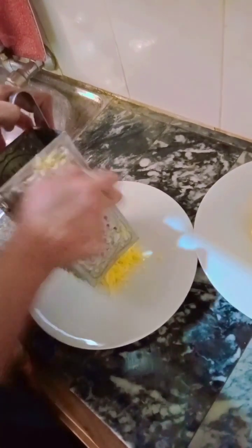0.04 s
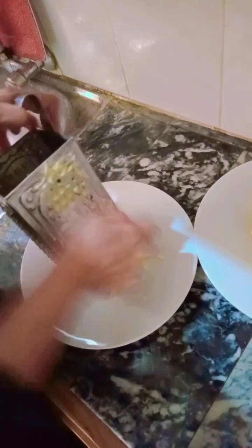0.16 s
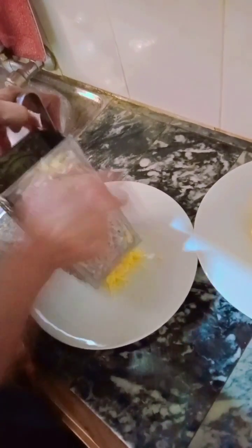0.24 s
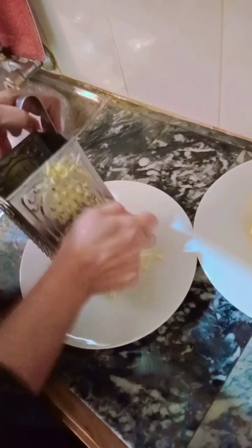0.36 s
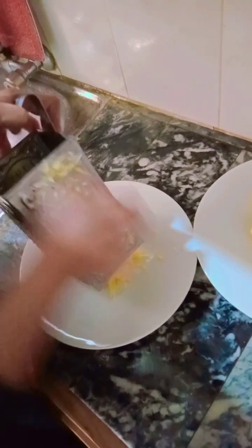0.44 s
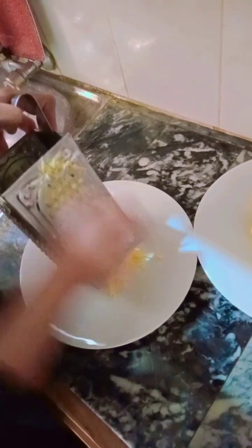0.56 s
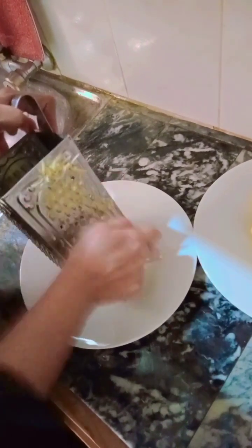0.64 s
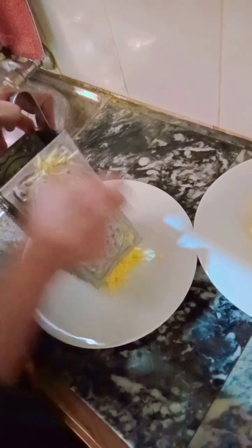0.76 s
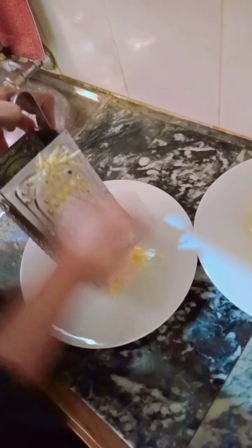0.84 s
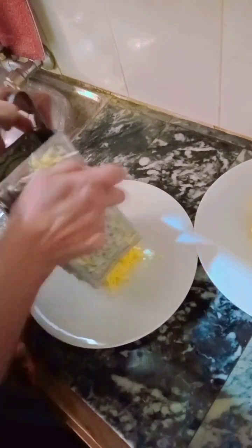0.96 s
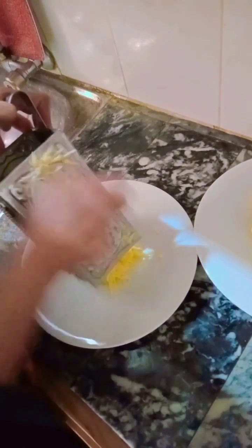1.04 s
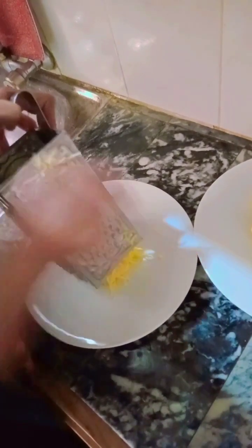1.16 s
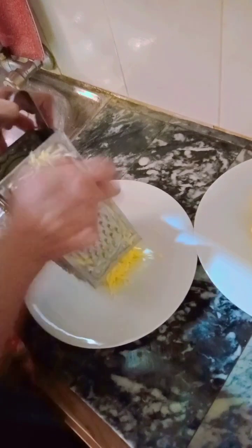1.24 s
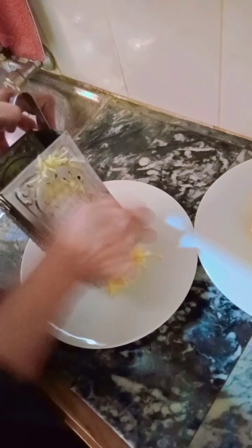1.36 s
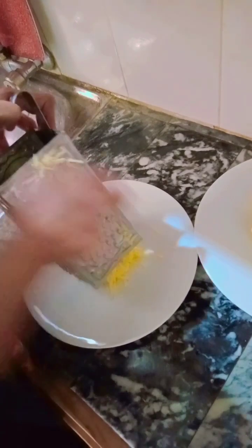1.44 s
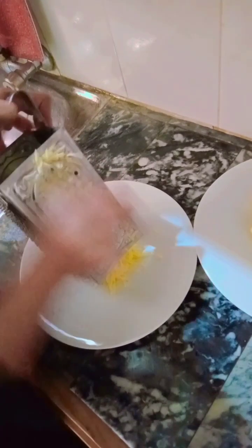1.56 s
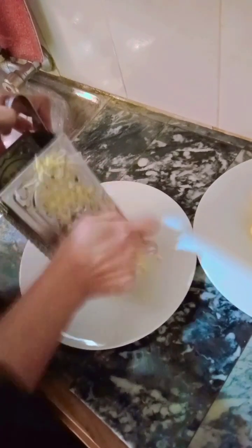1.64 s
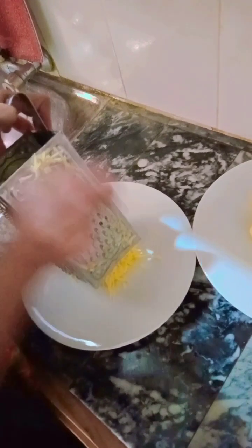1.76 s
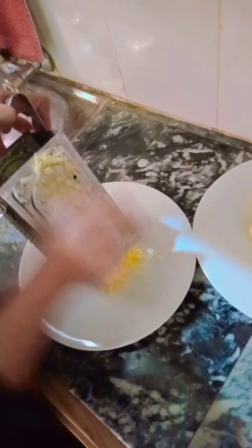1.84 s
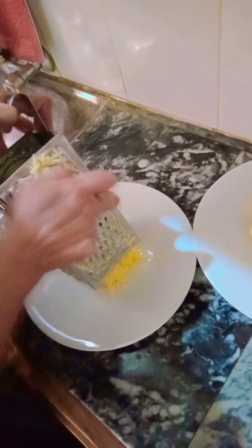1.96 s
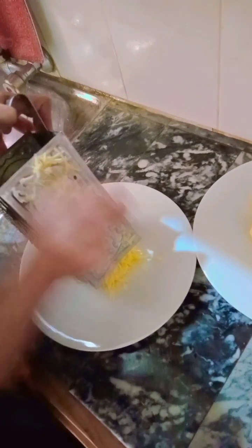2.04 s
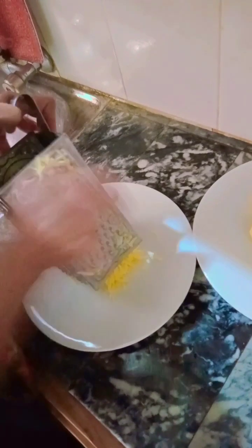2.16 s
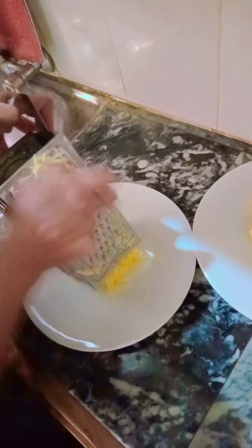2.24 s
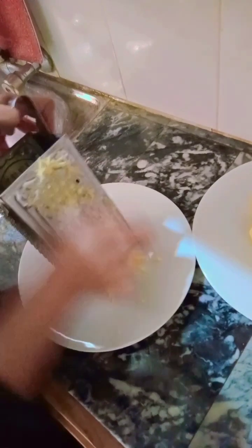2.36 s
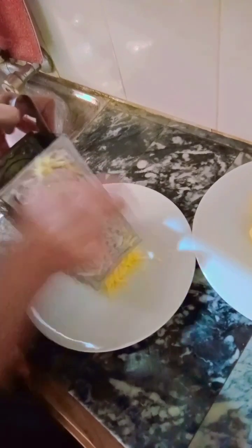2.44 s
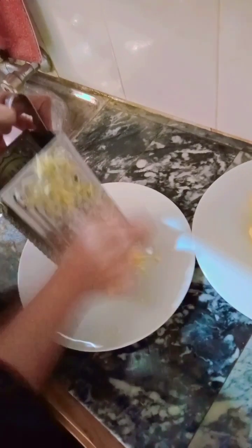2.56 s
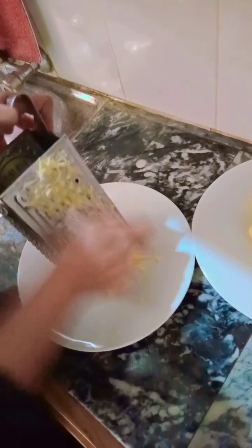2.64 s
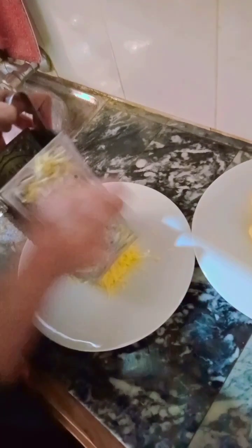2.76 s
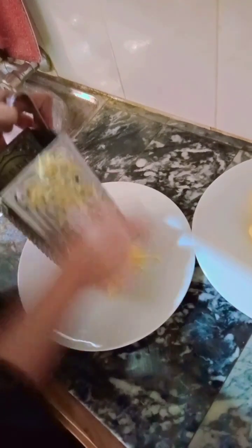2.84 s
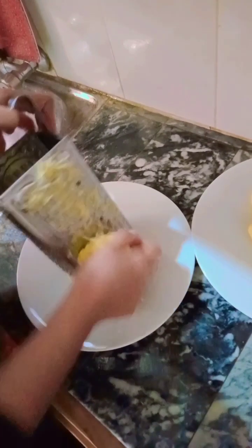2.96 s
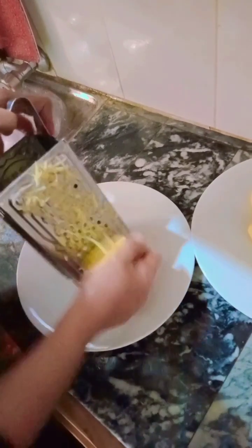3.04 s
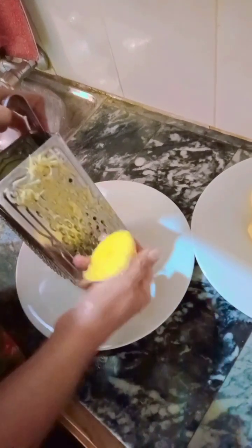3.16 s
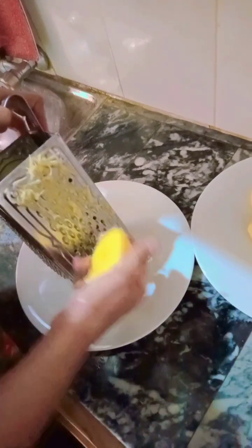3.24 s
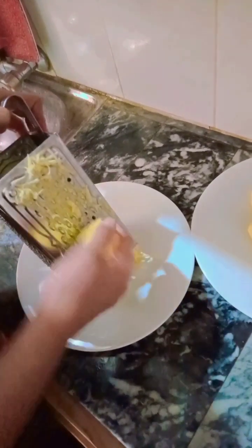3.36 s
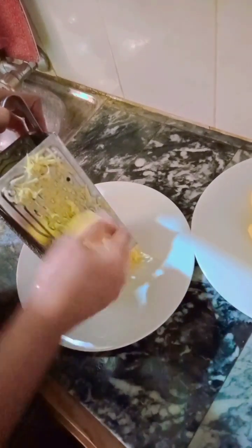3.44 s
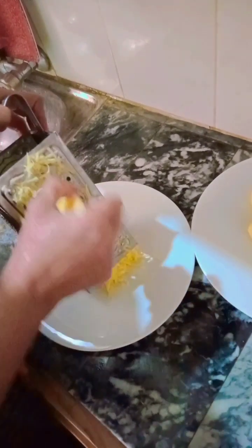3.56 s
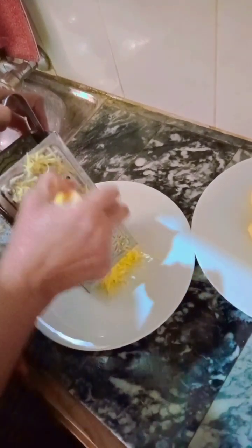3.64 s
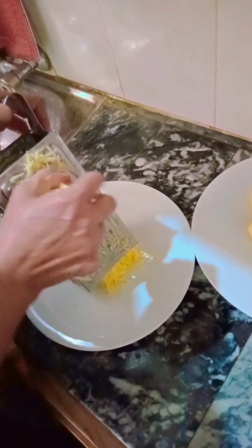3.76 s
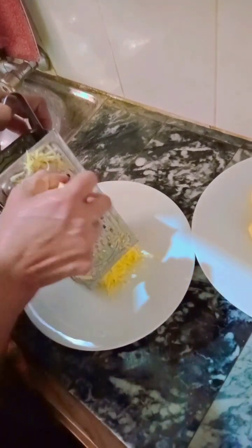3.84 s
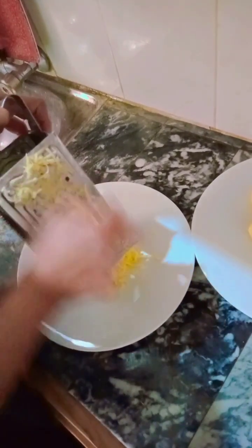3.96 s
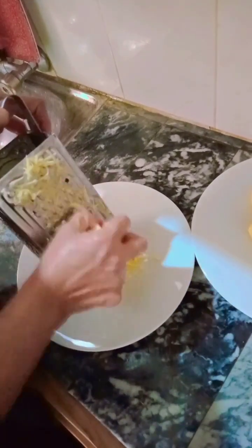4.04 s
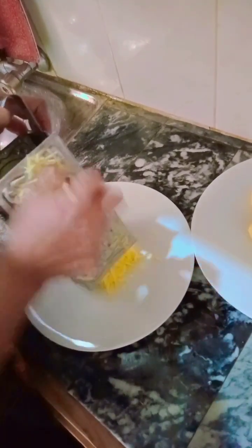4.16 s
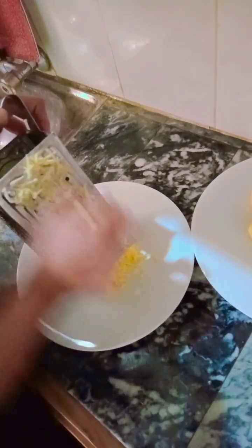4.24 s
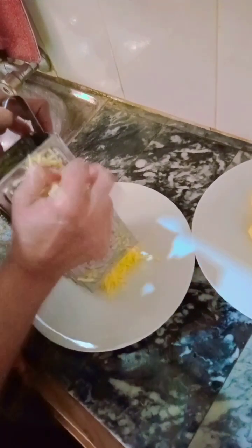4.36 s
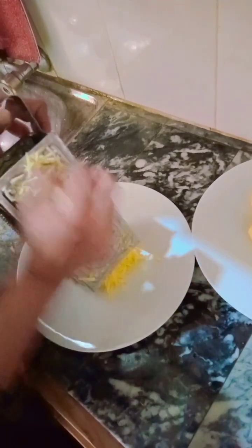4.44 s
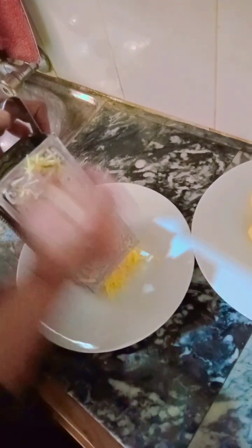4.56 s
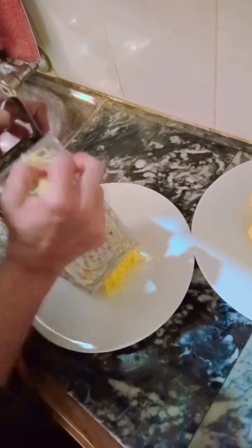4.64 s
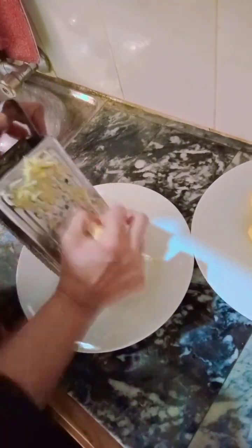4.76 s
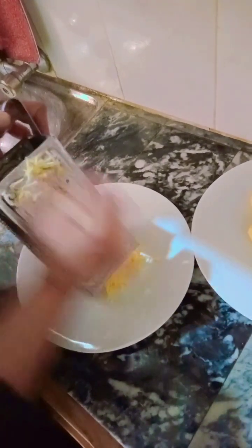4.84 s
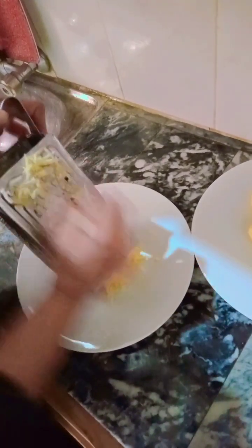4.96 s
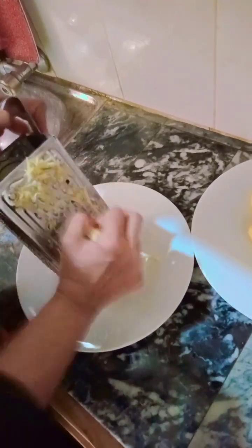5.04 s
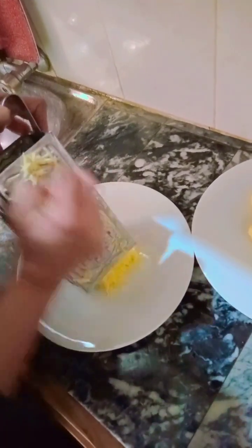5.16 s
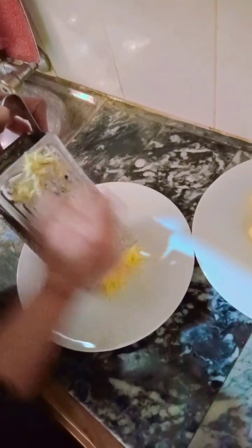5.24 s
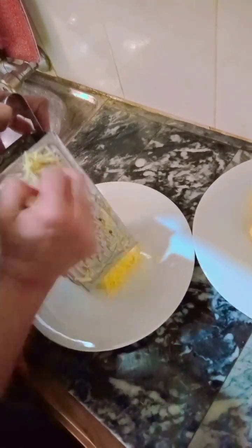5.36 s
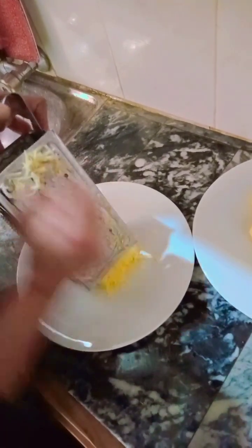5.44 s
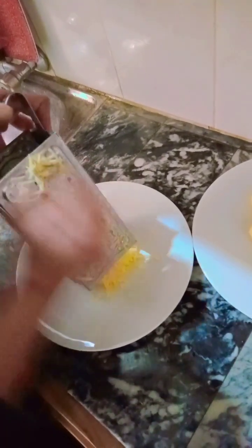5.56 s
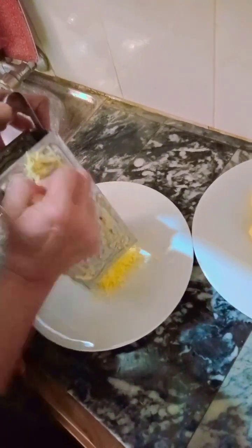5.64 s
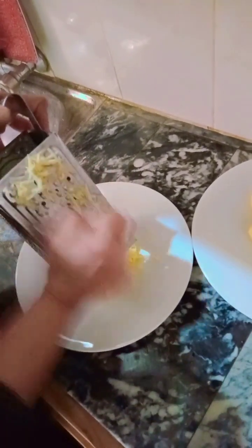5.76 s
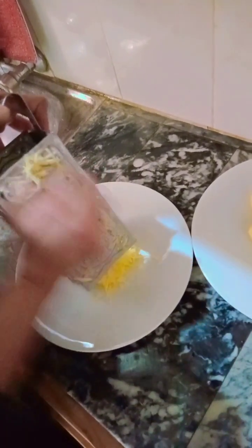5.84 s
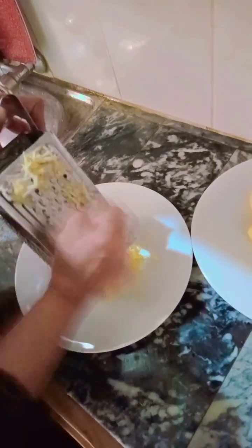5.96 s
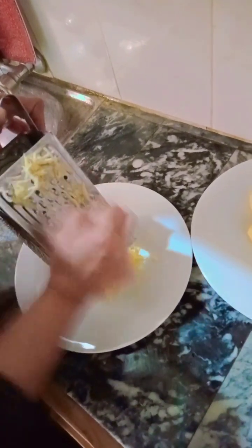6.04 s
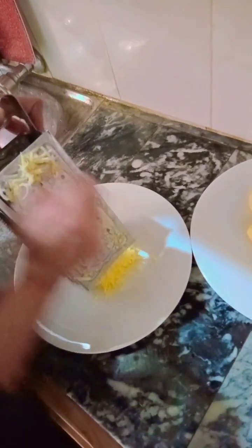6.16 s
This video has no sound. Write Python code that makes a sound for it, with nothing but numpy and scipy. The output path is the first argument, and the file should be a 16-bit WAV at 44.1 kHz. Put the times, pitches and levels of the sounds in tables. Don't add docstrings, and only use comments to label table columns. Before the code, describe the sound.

From 0 to 2.65 s a potato is rasped quickly on a steel box grater, close to the microphone: strong gritty pushes of about 0.13 s every quarter second, each preceded by a shorter, somewhat weaker pull. The tearing is a bright, crunchy hiss with a tinny sheet ring and hollow box resonance; a knock lands at 1.3 s. At 2.7 s the grater bumps and rocks softly, and at 2.86 s its rim taps the plate with a short clink. Only faint brushes and quiet room air remain until 3.7 s. Grating then resumes, softer and more hollow, with dull knocks around 3.9, 4.1, 4.5 and 5.1 s, growing firmer near 4.7 to 5.2 s. At 5.29 s the rim skips on the china in a loud metallic clatter lasting a tenth of a second. Lighter strokes continue, with a small tick at 5.57 s, through the end just past 6 s. Tiles add a brief echo.

```python
import sys
import numpy as np
from scipy import signal
from scipy.fft import rfft, irfft, next_fast_len
from scipy.io import wavfile
from scipy.ndimage import uniform_filter1d, map_coordinates

SR = 44100
rng = np.random.default_rng(int(sys.argv[2]) if len(sys.argv) > 2 else 0)


def invert_db(x):
    u = np.asarray(x, float) / 20
    return 10 ** u


def waveform_to_disk(signal):
    frames = np.transpose(np.atleast_2d(signal))
    scaled = np.clip(frames, -1, 1) * 32767
    samples = np.round(scaled).astype(np.int16)
    wavfile.write(sys.argv[1], SR, samples)


N = 272979

# centre in Hz, width in Hz, level in dB.
SHEET_MODES = [(1371, 114, -9), (1705, 170, -9), (2067, 295, -8), (2430, 153, -1.5), (2768, 212, -2),
               (3186, 400, -5), (3448, 90, -1.5), (3693, 102, -0.5), (4196, 180, -7), (4950, 120, -15.5)]
# centre in Hz, width in Hz, level in dB.
BOX_MODES = [(161, 30, -17), (260.2, 16.8, -10), (353, 29, 0), (453.6, 65, -1), (626.5, 52.5, -5),
             (728, 96, -2.5), (808, 124, -4), (915.6, 72, -2.5), (1233, 135, -11.5), (1296, 119, -12)]
# centre in Hz, width in Hz, level in dB.
CRACK_MODES = [(700, 280, -2.5), (1710, 700, -5), (3110, 1100, -20)]


def unit(x):
    return x / np.sqrt(np.mean(x ** 2) + 1e-20)


def along(points, hz):
    f, v = np.transpose(points)
    return np.interp(np.log(hz + 1), np.log(f + 1), v)


def wobble(rate):
    knots = rng.standard_normal(int(N * rate / SR) + 4)
    return map_coordinates(knots, [np.arange(N) * rate / SR])


def filtered(x, response):
    m = next_fast_len(N + SR // 2)
    hz = np.fft.rfftfreq(m, 1 / SR)
    return irfft(rfft(x, m) * response(hz), m)[:N]


def resonant(modes):
    def response(f):
        total = 0
        for k, (centre, width, db) in enumerate(modes):
            damping = 1j * f * width
            total = total + (-1) ** k * invert_db(db) * damping / (centre * centre - f * f + damping)
        return total
    return response


def snaps(per_s, spread_db, smooth):
    when, size, sign = rng.random((3, N))
    heights = invert_db(-spread_db * np.log(size + 0.0074)) * np.sign(sign - 0.5)
    pops = (when < per_s / SR) * heights
    return unit(unit(pops) + smooth * rng.standard_normal(N))


def pressure():
    # start in s, length in s, shred in dB, swell toward the end in dB.
    pushes = [(0.05, 0.13, -26.5, -1), (0.295, 0.12, -26.5, -3), (0.531, 0.13, -27, -8),
              (0.778, 0.11, -27, 2.8), (1.009, 0.14, -26.5, -0.5), (1.264, 0.16, -29.5, 14),
              (1.538, 0.12, -27, -0.5), (1.768, 0.12, -28.5, 2), (2.005, 0.13, -27.5, 0),
              (2.263, 0.13, -29, 2.5), (2.516, 0.14, -28.5, 3), (3.77, 0.05, -41, -20.5),
              (3.948, 0.12, -36, 7.5), (4.192, 0.12, -32.2, 1), (4.438, 0.12, -31.5, -2),
              (4.681, 0.13, -29, 7), (4.942, 0.13, -30, 0), (5.189, 0.12, -29.5, -9.5),
              (5.418, 0.13, -35, 5), (5.656, 0.13, -36, 19.5), (5.903, 0.15, -35.5, 19),
              (6.156, 0.1, -45.5, 8)]
    # start in s, length in s, shred in dB, swell in dB.
    pulls = [(-0.009, 0.062, -31, -32), (0.207, 0.079, -33, -9.5), (0.457, 0.071, -32, -6.5),
             (0.698, 0.072, -30.5, 1.5), (0.934, 0.074, -32, 6), (1.175, 0.086, -32, 15),
             (1.448, 0.083, -33, 19), (1.658, 0.1, -39.5, 42), (1.906, 0.092, -35.5, 22),
             (2.162, 0.088, -34.5, 29), (2.42, 0.089, -32.5, 13), (3.694, 0.086, -39, 7.5),
             (3.842, 0.093, -41.5, 19.5), (4.074, 0.12, -38.5, 7), (4.342, 0.088, -36.5, 8),
             (4.621, 0.063, -33, -4), (4.861, 0.075, -32.5, -2), (5.105, 0.087, -35, -7),
             (5.348, 0.072, -39.5, 9), (5.59, 0.071, -40, 5.5), (5.843, 0.071, -39.5, 30.5),
             (6.09, 0.08, -40, 10)]
    # start in s, length in s, shred in dB, swell in dB.
    drags = [(.42, 0.075, -53, -2.5), (.66, 0.092, -52.5, 2), (.9, 0.064, -54, -3), (2.69, 0.064, -60, -2),
             (2.74, 0.08, -72, 0), (2.812, 0.04, -60.5, -3), (3.205, .03, -80, -6),
             (3.317, 0.063, -67.5, -11), (3.421, 0.047, -73, 14), (3.49, 0.019, -78.5, 0),
             (3.581, 0.022, -67.5, -24.5), (3.592, 0.14, -72.5, 13), (4.59, 0.041, -45.5, 1.5),
             (4.825, 0.037, -49, -8), (5.075, 0.037, -54, 0), (5.81, 0.061, -61, 6)]
    # time in s, extra ring in dB.
    fresh_face = [(0, -0.2), (1.0, -0.9), (1.35, -0.5), (1.8, 0.2), (2.15, -2.5), (2.6, -0.1), (3.2, 0),
                  (3.75, 1.5), (4.1, 1), (4.3, -0.5), (4.5, 2.5), (4.72, -3.4), (4.9, -1.5), (5.2, -2),
                  (5.5, -1), (6.1, 0)]
    firm_db = -30
    sheet_per_soft_db, box_per_soft_db, fresh_on_sheet = 0.1555, 0.2523, 0.25
    # strokes, sheet and box over the shred in dB, roundness (low = full speed is reached at once and held)
    kinds = (pushes, 0.8, -0.84, 0.9), (pulls, 3.5, 1.03, 1.06), (drags, 1.2, -1, 0.63)

    out = np.zeros((3, N + SR))
    for strokes, sheet_db, box_db, roundness in kinds:
        for start, length, db, swell_db in strokes:
            span = np.arange(max(round(start * SR), 0), round((start + length) * SR))
            u = np.clip((span / SR - start) / length, 0, 1)
            speed = np.abs(np.sin(np.pi * u)) ** (roundness * np.array([[1.1], [0.9], [0.8]]))
            swell = swell_db * np.array([[1], [0.7], [0.55]]) * (u - 0.5)
            soft = firm_db - db
            fresh = np.interp(start, *np.transpose(fresh_face))
            sheet_ring = sheet_db + sheet_per_soft_db * soft + fresh_on_sheet * fresh
            box_ring = box_db + box_per_soft_db * soft + fresh
            out[:, span] += speed * invert_db(db + swell + [[0], [sheet_ring], [box_ring]])
    out = out[:, :N]
    return out + invert_db(-27.5) * uniform_filter1d(out, size=5000, axis=1)


def patchy(x, depth_db):
    z = signal.stft(x, nperseg=1024)[2]
    field = uniform_filter1d(rng.standard_normal(z.shape), size=5, axis=0)
    field = uniform_filter1d(field, size=5, axis=1)
    return signal.istft(z * invert_db(depth_db * unit(field)), nperseg=1024)[1][:N]


def rasp():
    # frequency in Hz, density in dB per Hz.
    shred_spectrum = [(2530, -22.5), (4300, -2), (4630, -4), (5830, -12), (7500, -7.5), (8180, -1.5),
                      (9150, 0), (10500, -11), (12500, -11), (14100, -12), (15500, -11.5)]
    shred, sheet, box = pressure()
    catch = wobble(70)

    hiss = unit(filtered(snaps(6000, 1.6, smooth=1.25), lambda f: invert_db(along(shred_spectrum, f))))
    hiss = patchy(hiss, depth_db=1.3) * shred * invert_db(0.58 + 1.63 * catch + 0.98 * wobble(260))

    face = snaps(3000, 1.8, smooth=1.0) * sheet * invert_db(0.24 * catch + 0.9 * wobble(150))
    hollow = snaps(1200, 2.1, smooth=0.8) * box * invert_db(0.9 * catch + 0.7 * wobble(30))
    ring = invert_db(14) * filtered(face, resonant(SHEET_MODES))
    ring = ring + invert_db(19) * filtered(hollow, resonant(BOX_MODES))

    push = rng.standard_normal(N) * uniform_filter1d(box, size=9000)
    counter = filtered(push, resonant([(97.7, 72, 2.4)]))
    return hiss + patchy(ring, depth_db=3.0) + counter


def knocks():
    # time in s, peak in dB, sheet share in dB.
    blows = [(1.311, -10.5, -2.5), (3.724, -26, -9), (3.867, -20, -8.5), (3.879, -16, -16),
             (4.089, -10, -11), (4.225, -18, -5), (4.475, -13, -4), (4.641, -23, 8), (4.881, -14.5, -8),
             (5.12, -13, -9.5), (0.305, -31.5, 0), (2.282, -22.5, 2.8), (3.742, -20, -19),
             (4.116, -14, -6.5), (4.457, -22.5, 0.5), (4.363, -20, -16)]
    t = np.arange(SR // 20) / SR
    scuff_s = np.array([[0.04], [0.04], [0.015]])
    low, high, crack = np.zeros((3, N))
    for s, db, sheet_db in blows:
        contact = rng.standard_normal((3, len(t))) + 9 * (t == 0)
        puff = invert_db(db - 60 * t / scuff_s) * contact
        low[round(s * SR):][:len(t)] += puff[0]
        high[round(s * SR):][:len(t)] += invert_db(sheet_db) * puff[1]
        crack[round(s * SR):][:len(t)] += puff[2]
    box = invert_db(12) * filtered(low, resonant(BOX_MODES))
    sheet = invert_db(6.5) * filtered(high, resonant(SHEET_MODES))
    return box + sheet + invert_db(-1.0) * filtered(crack, resonant(CRACK_MODES))


def clink(hits, modes, ring_db, rattle_db, rattle_s, shiver):
    out, jolt = np.zeros((2, N + SR))
    t = np.arange(SR // 4) / SR
    onset = 1 - np.exp(-t / 0.00035)
    for s, db in hits:
        for hz, level, t60 in modes:
            drift = np.cumsum(rng.standard_normal(len(t))) / np.sqrt(SR)
            phase = 2 * np.pi * hz * t + shiver * np.sqrt(hz / 3100) * drift
            ring = invert_db(level + rng.normal(0, 1.2) - 60 * t / t60) * np.sin(phase)
            out[round(s * SR):][:len(t)] += invert_db(db + ring_db) * onset * ring
        rattle = invert_db(db + rattle_db - 60 * t / rattle_s) * rng.standard_normal(len(t))
        jolt[round(s * SR):][:len(t)] += rattle

    def whole_grater(f):
        body = resonant(SHEET_MODES)(f) + invert_db(-1.5) * resonant(BOX_MODES)(f)
        body = body + invert_db(-0.5) * resonant(CRACK_MODES)(f)
        return body / (1 + 1j * f / 4500) ** 2

    return out[:N] + filtered(jolt[:N], whole_grater)


def clatter():
    # time in s, peak in dB.
    skips = [
        (5.287, -0.5),
        (5.295, 2),
        (5.306, -2),
        (5.327, -4),
        (5.331, -7.5),
        (5.35, -16),
        (5.361, -15),
        (5.377, -18),
    ]
    # frequency in Hz, level in dB, t60 in s.
    skip_modes = [(341.8, -10.5, 0.3), (894, -8, 0.094), (1113, 3.3, 0.13), (1297, 0, 0.055),
                  (1460, -7, .13), (1480, -8.5, 0.11), (1595, -2, 0.048), (2207, 0, 0.1),
                  (2810, 2.5, 0.037), (2810, -3, .2), (3280, -28, 0.18), (3560, -1.5, 0.12),
                  (3970, -18, 0.16), (4520, -14.5, 0.1), (4780, -14, 0.075), (4920, -20, 0.056),
                  (6300, -34, .1), (5300, -26, 0.12)]
    return clink(skips, skip_modes, ring_db=-19.5, rattle_db=-3.5, rattle_s=0.06, shiver=21)


def tap():
    # time in s, peak in dB.
    touches = [
        (2.86, -14),
        (2.864, -11.5),
        (2.88, -26),
    ]
    # frequency in Hz, level in dB, t60 in s.
    tap_modes = [(365.6, -1, 0.21), (728, -2, 0.13), (793, -17.5, .07), (900, 3.5, 0.14), (1150, 9, 0.081),
                 (1678, 9.5, 0.036), (2136, 12.5, 0.023), (2240, -14.5, 0.31), (2860, -4.5, 0.18),
                 (3200, -14, 0.13), (3670, -13, 0.13), (5030, -14.5, 0.12), (6850, -10, .03),
                 (9120, -6.5, 0.037)]
    return clink(touches, tap_modes, ring_db=-14.5, rattle_db=4, rattle_s=0.06, shiver=9)


def bump():
    # time in s, peak in dB.
    rocks = [
        (2.679, -16),
        (2.688, -18),
        (2.712, -25),
    ]
    # frequency in Hz, level in dB, t60 in s.
    bump_modes = [(365, -3.5, 0.22), (474, -7.5, .1), (728, -20, .1), (928, 3, 0.07), (1240, -9.5, 0.071),
                  (1370, -14, 0.065), (1690, -8.5, 0.041), (2310, -6, 0.033), (3100, -15, .03)]
    return clink(rocks, bump_modes, ring_db=-9, rattle_db=-3, rattle_s=0.025, shiver=26)


def tick():
    # time in s, peak in dB.
    touch = [
        (5.5679, -14),
    ]
    # frequency in Hz, level in dB, t60 in s.
    tick_modes = [(924, -5.5, 0.11), (2370, 1, 0.031), (2940, -3.5, 0.23), (3630, -9, 0.07),
                  (4500, -16, 0.065), (5300, -32, 0.0635)]
    return clink(touch, tick_modes, ring_db=-11.5, rattle_db=6.5, rattle_s=0.015, shiver=7.4)


def thuds():
    # time in s, peak in dB.
    swings = [
        (2.704, -33),
        (2.784, -44),
        (3.73, -54),
        (3.87, -37),
        (4.09, -34.5),
        (4.291, -48.5),
    ]
    out, t = np.zeros(N + SR), np.arange(SR // 8) / SR
    swing = (1 - np.exp(-t / 0.008)) * np.sin(2 * np.pi * 172 * t)
    for s, db in swings:
        out[round(s * SR):][:len(t)] += invert_db(db - 60 * t / 0.13) * swing
    return out[:N]


def kitchen(x):
    # frequency in Hz, t60 in s.
    tile_decay = [(200, 0.43), (1000, 0.38), (4000, 0.24), (12000, 0.19)]
    hz, t, z = signal.stft(rng.standard_normal(SR // 2), SR, nperseg=256)
    decay = invert_db(-60 * t / along(tile_decay, hz)[:, None])
    tail = signal.istft(z * decay, SR, nperseg=256)[1]
    delayed = np.pad(x, (200, 0))
    return signal.fftconvolve(delayed, tail / np.linalg.norm(tail))[:N]


def hush():
    # frequency in Hz, density in dB per Hz.
    air_spectrum = [(25, -13.5), (50, -4.5), (97, 1), (140, -4), (209, 4), (281, -3), (358, 2), (702, 2.5),
                    (1230, -12), (1660, -12), (3620, -12), (5720, -33), (8790, -25), (15500, -38.5)]
    air = unit(filtered(rng.standard_normal(N), lambda f: invert_db(along(air_spectrum, f))))
    return invert_db(-61.5 + 0.87 * wobble(27)) * air


def scene():
    grater = rasp() + knocks() + thuds() + bump() + tap() + clatter() + tick()
    return (grater + invert_db(-10.5) * kitchen(grater) + hush())[None]


def band_limit(x):
    return signal.sosfilt(signal.butter(12, 15610, fs=SR, output="sos"), x)


def record(dry):
    def microphone(f):
        return (1j * f / (45 + 1j * f)) ** 4 * (f < 15640)

    mix = filtered(dry[0], microphone)[None]
    return band_limit(mix)


dry = scene()
out = record(dry)
waveform_to_disk(out)
```